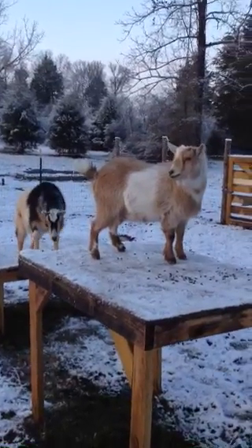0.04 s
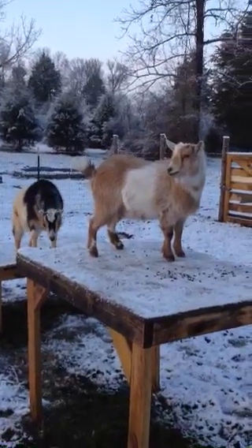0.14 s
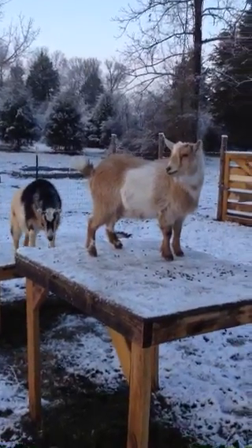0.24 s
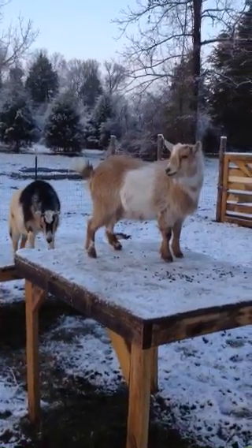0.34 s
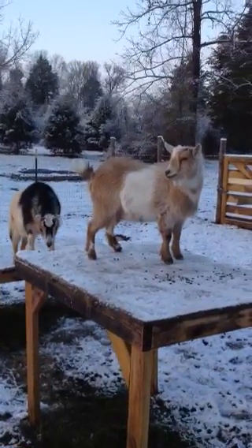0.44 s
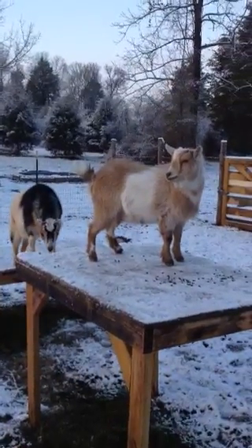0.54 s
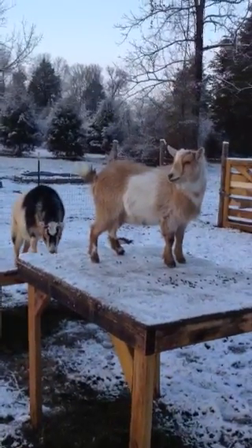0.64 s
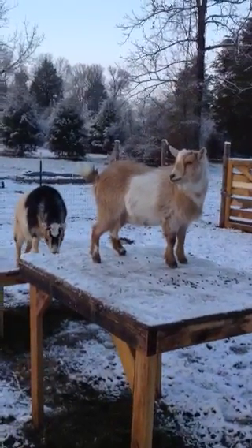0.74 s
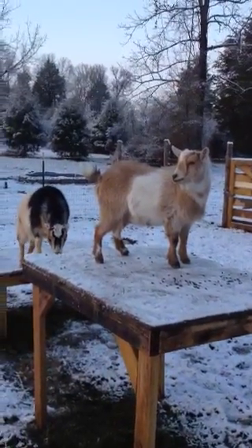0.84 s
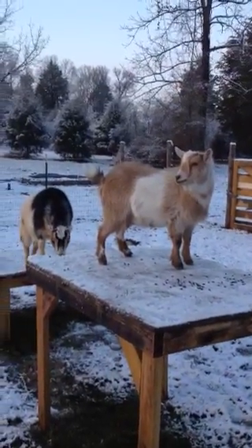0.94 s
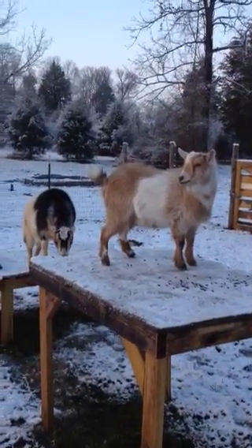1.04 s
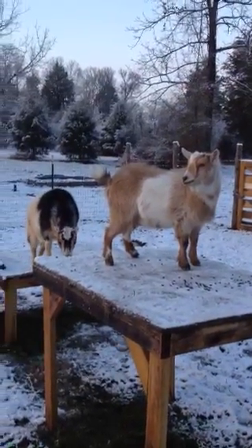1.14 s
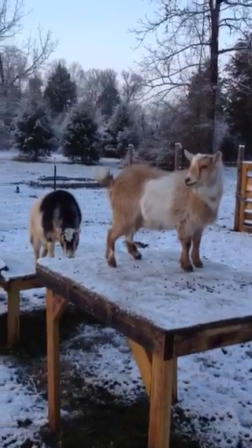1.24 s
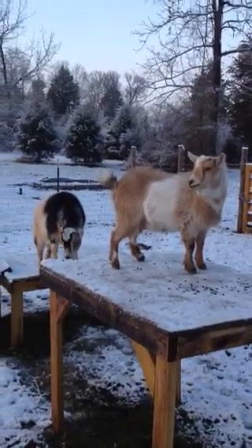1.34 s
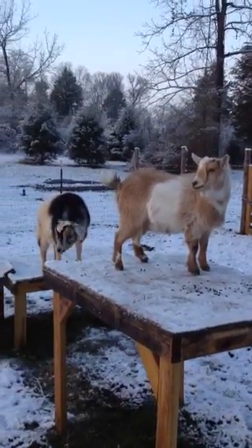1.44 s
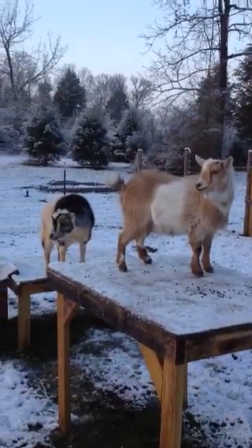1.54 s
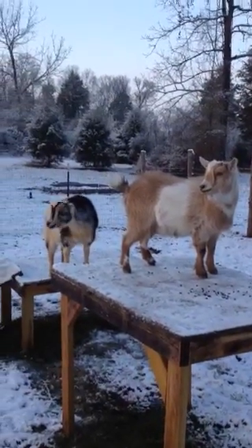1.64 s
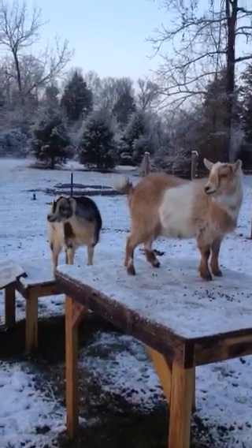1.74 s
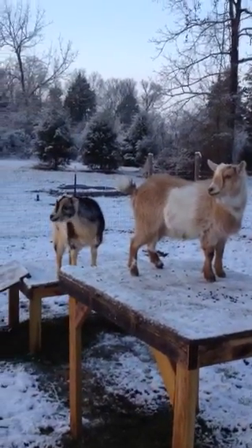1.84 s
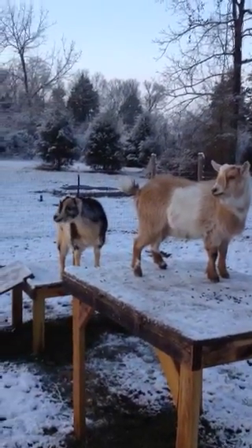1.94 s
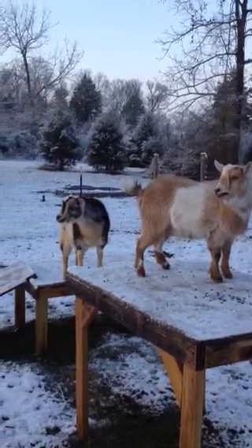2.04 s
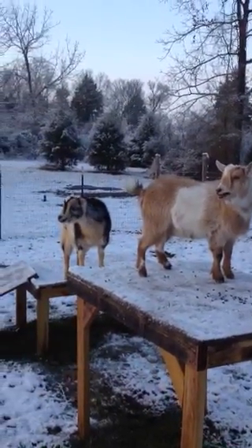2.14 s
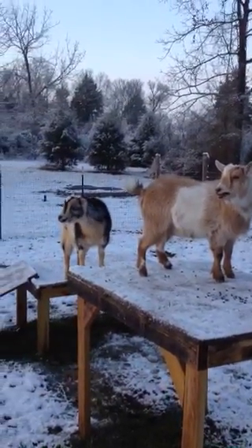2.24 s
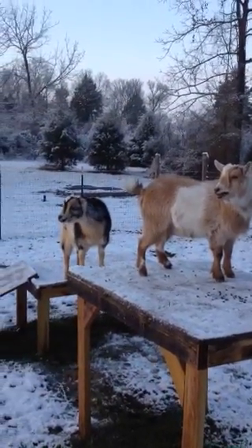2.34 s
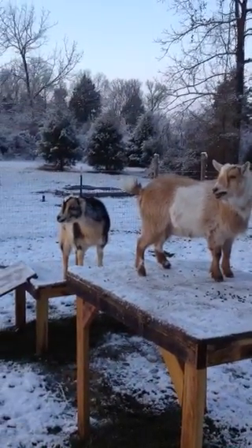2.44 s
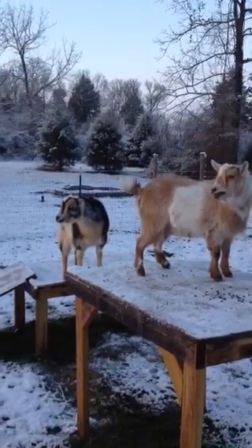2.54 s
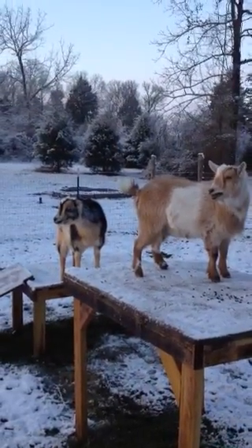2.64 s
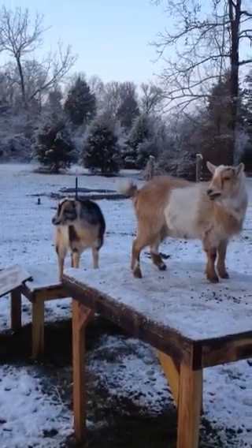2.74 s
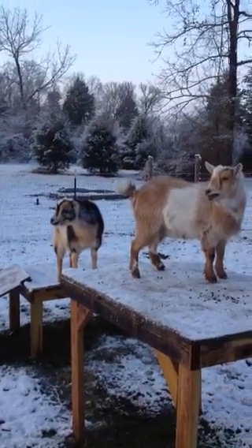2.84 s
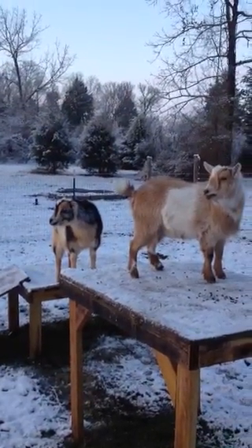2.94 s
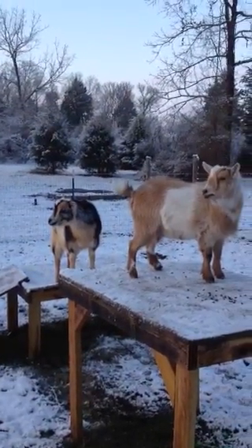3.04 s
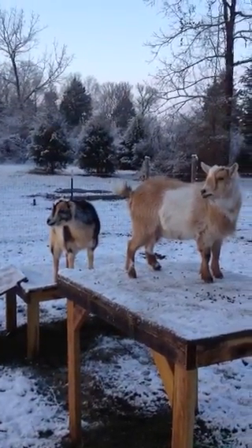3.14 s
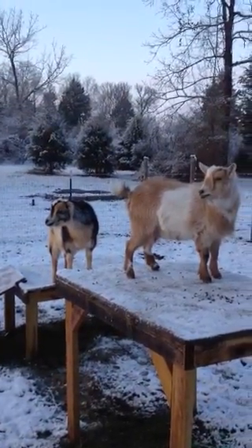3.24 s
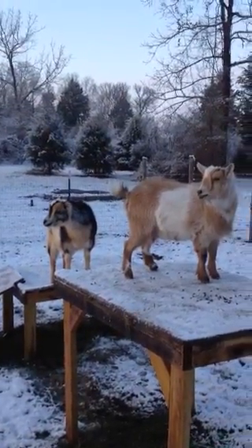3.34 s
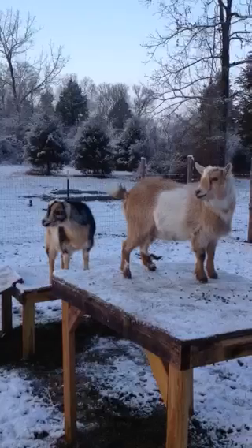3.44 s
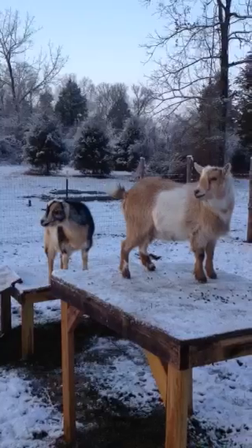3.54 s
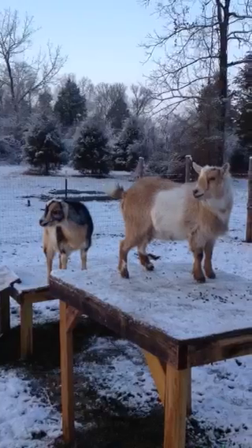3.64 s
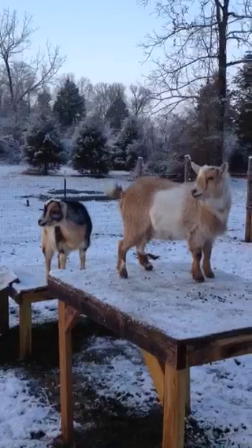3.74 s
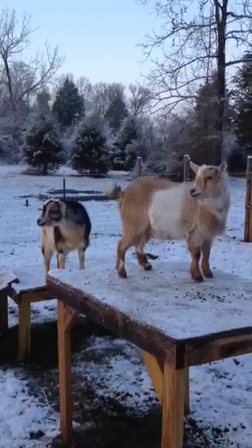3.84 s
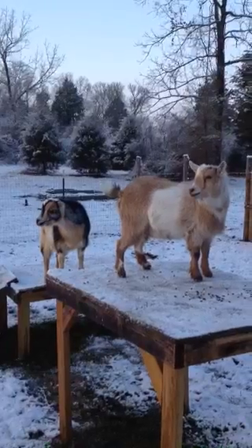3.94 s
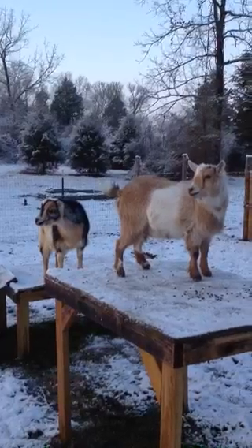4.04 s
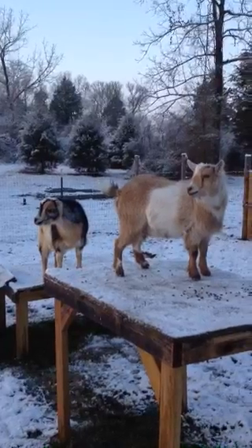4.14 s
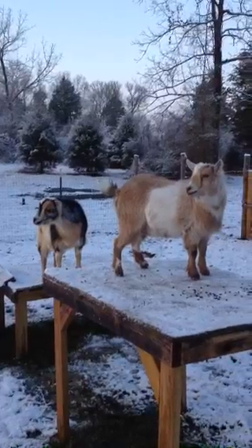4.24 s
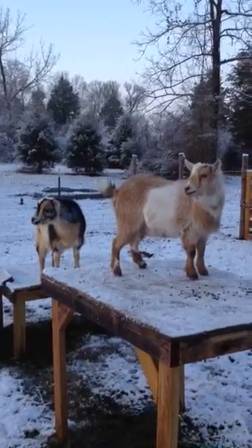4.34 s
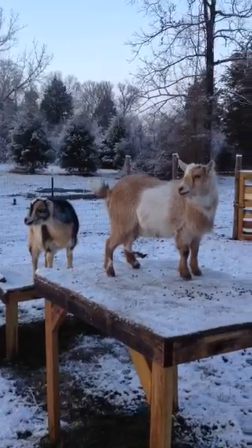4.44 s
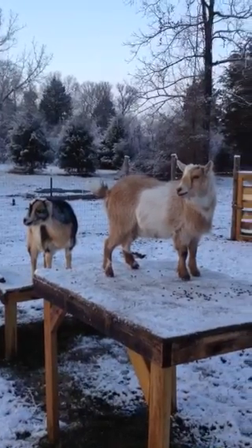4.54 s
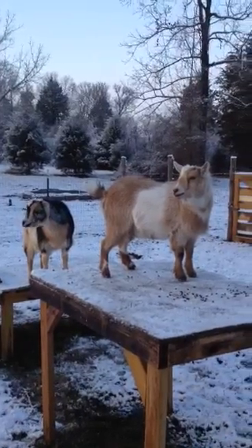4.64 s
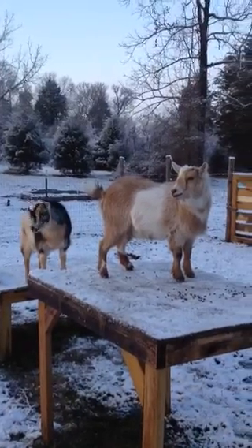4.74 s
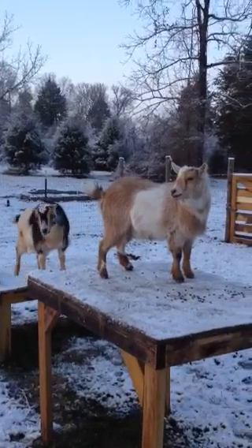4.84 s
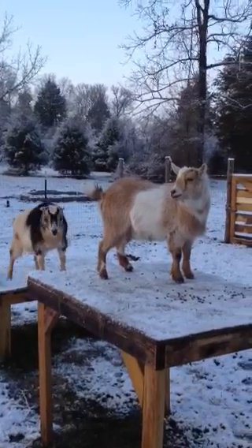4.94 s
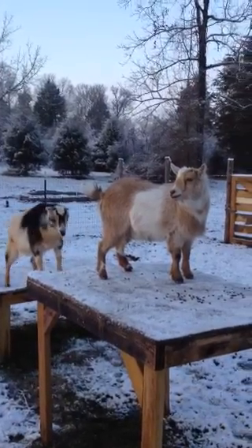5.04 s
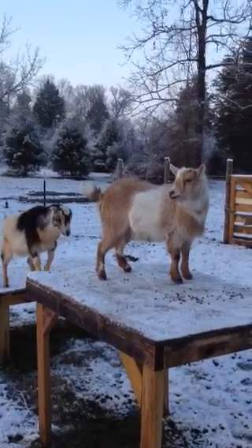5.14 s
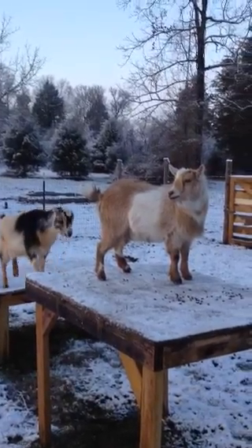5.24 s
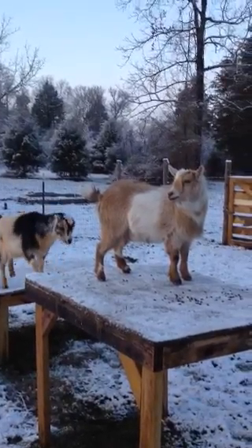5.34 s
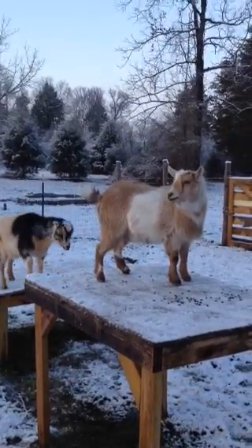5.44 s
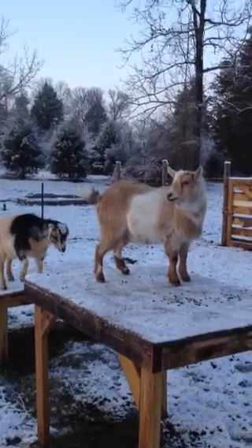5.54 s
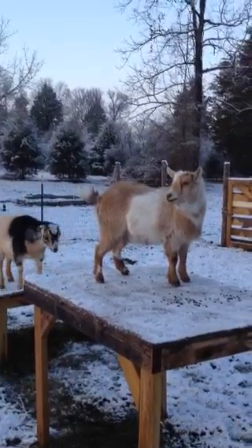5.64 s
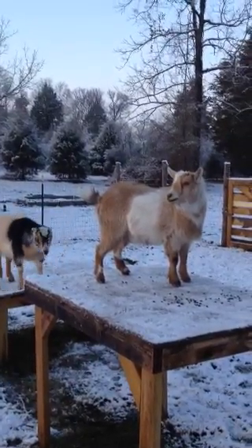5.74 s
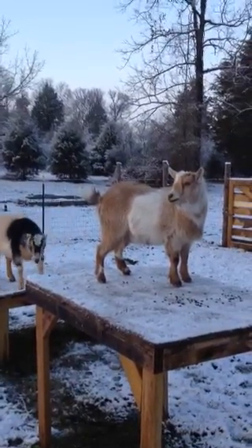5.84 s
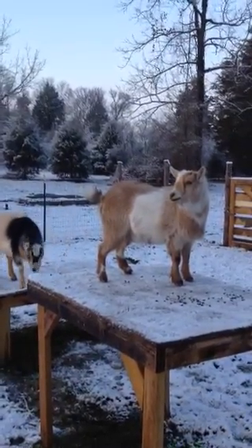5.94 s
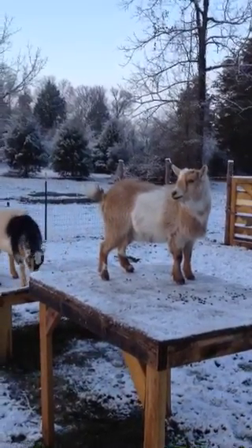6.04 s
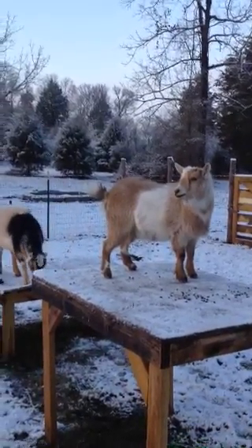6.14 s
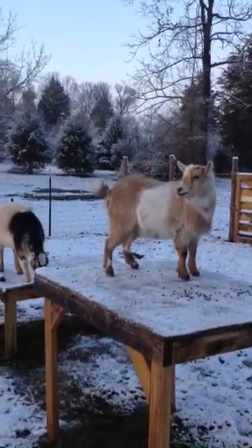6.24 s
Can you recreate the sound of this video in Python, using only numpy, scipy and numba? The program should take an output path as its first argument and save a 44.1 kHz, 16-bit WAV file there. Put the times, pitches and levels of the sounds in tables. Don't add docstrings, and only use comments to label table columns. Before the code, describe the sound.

Quiet snowy yard with a very faint far motor hum. Light hoof taps, soft snow crunches and a dry rustle come first. At two seconds a small goat lets out one loud, nasal, rapidly trembling bleat lasting about a second, ending in a sagging rattle. Two seconds of near stillness follow, then a cluster of sharp hoof knocks and snow crunches on planks. Single microphone, nearby, outdoors.

```python
import sys
import numpy as np
from scipy import signal
from scipy.fft import rfft, irfft
from scipy.io import wavfile
from scipy.ndimage import uniform_filter1d
from numba import njit

SR = 44100
rng = np.random.default_rng(int(sys.argv[2]) if len(sys.argv) > 2 else 0)


def invert_db(x):
    u = np.asarray(x, float) / 20
    return 10 ** u


def waveform_to_disk(signal):
    frames = np.transpose(np.atleast_2d(signal))
    scaled = np.clip(frames, -1, 1) * 32767
    samples = np.round(scaled).astype(np.int16)
    wavfile.write(sys.argv[1], SR, samples)


N = 278271

# (frequency [Hz], density [dB per Hz])
AIR_SPECTRUM = [(15, -41), (25, -43), (64, -15.5), (91, -18.5), (122, -3.5), (173, -8), (313, -7.5),
                (801, -12), (892, -12.5), (993, -16.5), (1750, -18), (2830, -22.5), (7650, -30.5),
                (10000, -36.5), (15400, -31)]
AIR_DB = -60.5
# (low [Hz], high [Hz], level [dB])
PORT_HISS = (3950, 4530, -86)
# (frequency [Hz], width [Hz], level [dB])
MOTOR_DUCT = (1736, 85, -77.5)
# (frequency [Hz], rms level [dB])
MOTOR_ORDERS = [(59.2, -89.5), (118.4, -66), (296.1, -73.5), (333.8, -75.5), (387.6, -79), (479.1, -76.5),
                (532.9, -79), (592.2, -83), (651.4, -80), (710.6, -82), (888.2, -76.5), (1007, -85.5),
                (1066, -87), (1184, -85.5)]
# (frequency [Hz], rms level [dB])
MAINS_TONE = [(121.3, -77)]

# (time [s], frequency [Hz], level [dB])
SQUEAK_CURVE = [
    (1.485, 12500, -86),
    (1.54, 12400, -86),
    (1.616, 13200, -83),
    (1.81, 11750, -83),
]
# (time [s], frequency [Hz], level [dB])
FAR_ANIMAL = [
    (0.8, 545, -76),
    (0.922, 563, -63.5),
    (0.978, 614, -63),
    (1.0, 555, -68),
]
# (time [s], frequency [Hz], level [dB])
BIRD_CURVE = [
    (3.47, 6540, -93),
    (3.52, 6760, -90),
    (3.62, 6894, -90),
]

# (time [s], level [dB])
RUSTLE_LEVEL = [
    (0.0, -73),
    (0.16, -75.5),
    (0.35, -83),
]
# (frequency [Hz], width [Hz], level [dB])
TWIG_RESONANCE = (9000, 2500, -38)
TWIG_TICKS = [1.251, 1.749]

# (time [s], peak level [dB], build-up [s])
SNOW_COLLAPSES = [(.03, -72, .03), (.164, -73, 0.041), (.244, -70.5, .09), (.468, -66.5, .012),
                  (.594, -83, .1), (5.112, -60, 0.0055), (5.334, -68, 0.21), (5.488, -53.5, 0.075),
                  (5.68, -69, 0.008), (5.73, -60, 0.024), (5.972, -61, 0.087), (6.168, -64, .03)]
# (frequency [Hz], density [dB per Hz])
SNOW_SPECTRUM = [(500, -21), (900, 4), (2000, 0), (3800, -6.5), (4600, 2.5), (5100, -36), (8000, -11),
                 (15000, -33)]

# (time [s], crack [dB], struck board [dB], ring of that board [Hz])
HOOF_STEPS = [(0.1594, -64, -70, 458), (0.2891, -57, -66, 360), (0.4665, -54, -61.5, 184),
              (1.05, -46, -48, 306), (1.0729, -66, -56, 364), (1.2628, -55, -48.5, 1040),
              (1.2844, -58, -49.5, 1160), (1.5596, -57, -76, 299), (5.114, -41.5, -49, 223),
              (5.135, -62, -53, 326), (5.1882, -51, -64.5, 480), (5.2521, -51, -56, 880),
              (5.3153, -49, -44.5, 790), (5.3352, -67, -55.5, 1150), (5.3542, -65, -61, 703),
              (5.4873, -34.5, -45.5, 273), (5.51, -39.5, -49.5, 372), (5.679, -47.5, -62.5, 604),
              (5.7177, -60, -64, 392), (5.7572, -52, -56, 1200), (5.7818, -51, -48, 1250),
              (5.8197, -52.5, -79, 326), (5.9653, -41.5, -47, 1250), (5.9891, -48.5, -51, 1290),
              (6.1691, -45.5, -54.5, 1060), (6.199, -53, -58, 883), (6.2386, -55, -65, 324)]
# (frequency [Hz], level [dB])
PLATFORM_MODES = [(210, 0.5), (290, -1), (385, 3.5), (480, 0.5), (600, -28)]
# (frequency [Hz], level [dB])
PLANK_MODES = [(790, -5), (960, 1), (1150, 9.5), (1300, 0), (1520, 3), (1950, 7.5)]

# (time [s], pitch [Hz], effort [dB])
GRUNT_TURNS = [
    (1.923, 403.9, -65.5),
    (1.986, 383.2, -74),
]
# (time [s], pitch [Hz], effort [dB])
CATCH_TURNS = [
    (2.028, 396.4, -49),
    (2.056, 330.5, -43.5),
    (2.067, 322, -55),
    (2.082, 218.5, -58),
    (2.13, 396.6, -42.5),
    (2.141, 375, -45),
    (2.149, 338, -40),
    (2.162, 315.6, -63),
]
# (tensest [s], pitch [Hz], slackest after [s], pitch [Hz])
FOLD_WAVERS = [(2.205, 395.2, 0.025, 347.9), (2.262, 394, .025, 351), (2.325, 402.6, 0.024, 352.5),
               (2.376, 427.3, 0.035, 360.6), (2.446, 435.8, 0.036, 367.2), (2.508, 431, 0.043, 383.4),
               (2.573, 463.5, .038, 355.4), (2.661, 437.2, .041, 364.5), (2.735, 433, .031, 379.2),
               (2.797, 449, 0.049, 365.2), (2.877, 441.6, 0.036, 377), (2.942, 413.5, 0.027, 364.2)]
# (first slap [s], length [s], first pitch [Hz])
FOLD_CREAKS = [(2.1007, .014, 185), (2.1748, .013, 200), (2.2466, .006, 288), (2.3029, .0085, 284),
               (2.6315, .0125, 222)]
# (time [s], pitch [Hz], effort [dB])
FOLD_RUN_DOWN = [
    (2.983, 369.4, -48),
    (3.034, 293.4, -54.5),
    (3.048, 204.6, -54.5),
    (3.075, 138.2, -61),
]
# (time [s], first resonance [Hz], throat opening [dB])
MOUTH_SHAPE = [(1.9, 700, -2), (2.03, 686, -17.5), (2.06, 741, -13), (2.12, 905, -15), (2.22, 1073, -8.5),
               (2.92, 1082, -7), (3.0, 1023, -5.5), (3.045, 856.4, 0.5), (3.1, 650, 0)]
# (frequency [Hz], width [Hz], level [dB])
THROAT_PEAKS = [(445, 170, -13.5), (2010, 256, -0.5), (2580, 154, 7), (3100, 730, 1.5), (3900, 630, 1)]
# (frequency [Hz], width [Hz], level [dB])
TENSE_PEAKS = [(4655, 230, 0.5), (5010, 1030, -8)]
# (frequency [Hz], width [Hz], level [dB])
NASAL_PEAKS = [(5520, 345, -2.5), (6020, 570, -2.5), (6760, 260, -1.5), (7340, 210, -3.5), (8600, 370, -11)]
# (frequency [Hz], width [Hz], level [dB])
SLAP_PEAKS = [(8920, 860, -4), (12500, 4100, -13.5)]
# (delay [s], level [dB])
YARD_ECHOES = [(.0071, -19), (.0113, -18), (.0187, -20), (.029, -22), (.047, -25), (.083, -29)]
# (low [Hz], high [Hz], readiness [0-1 scale,
# offset])
PATCHY_BANDS = [(10500, 11600, .5), (12400, 13200, -.3)]


def rms_one(x):
    return x / np.sqrt(np.mean(x ** 2) + 1e-30)


def in_time(rows, edge_db=None):
    s, *columns = np.transpose(rows)
    return [np.interp(np.arange(N) / SR, s, c, edge_db, edge_db) for c in columns]


def coloured(points):
    hz, db = np.transpose(points)
    noise_hz = np.arange(1, N // 2 + 2) * SR / N
    gain = invert_db(np.interp(np.log(noise_hz), np.log(hz), db))
    return rms_one(irfft(rfft(rng.standard_normal(N)) * gain, N))


def drift(rate):
    knots_per_s = 60
    knots = rng.standard_normal(int(N / SR * knots_per_s) + 2)
    memory = np.exp(-2 * np.pi * rate / knots_per_s)
    knots = rms_one(signal.lfilter([1], [1, -memory], knots))
    return np.interp(np.arange(N) / SR * knots_per_s, np.arange(len(knots)), knots)


def band(x, low_hz, high_hz):
    return signal.sosfilt(signal.butter(2, [low_hz, high_hz], "band", fs=SR, output="sos"), x)


def resonance(x, hz, width_hz, db=0):
    r = np.exp(-np.pi * width_hz / SR)
    zeros = [(1 - r * r) / 2, 0, (r * r - 1) / 2]
    poles = [1, -2 * r * np.cos(2 * np.pi * hz / SR), r * r]
    return invert_db(db) * signal.lfilter(zeros, poles, x)


def parallel(x, peaks):
    return sum((-1) ** k * resonance(x, *peak) for k, peak in enumerate(peaks))


@njit
def moving_resonance(x, hz, r, sr):
    y = np.zeros(len(x))
    for i in range(2, len(x)):
        push = (1 - r * r) / 2 * (x[i] - x[i - 2])
        y[i] = push + 2 * r * np.cos(2 * np.pi * hz[i] / sr) * y[i - 1] - r * r * y[i - 2]
    return y


def air():
    hiss = invert_db(AIR_DB - 3 + 1.03 * drift(8.5)) * coloured(AIR_SPECTRUM)
    duct_hz, width_hz, duct_db = MOTOR_DUCT
    duct = rms_one(resonance(rng.standard_normal(N), duct_hz, width_hz)) * invert_db(duct_db + 1.8 * drift(21))
    low_hz, high_hz, port_db = PORT_HISS
    port = invert_db(port_db) * rms_one(band(rng.standard_normal(N), low_hz, high_hz))
    return hiss + duct + port


def motor():
    t = np.arange(N) / SR
    hum = np.zeros(N)
    for hz, db in MOTOR_ORDERS + MAINS_TONE:
        level = np.sqrt(2) * invert_db(db + 0.34 * drift(7.7))
        hum += level * np.sin(2 * np.pi * (hz * t + rng.random()))
    return hum


def whistle(rows, half_db):
    hz, db = in_time(rows)[0], in_time(rows, -130)[1]
    phase = 2 * np.pi * np.cumsum(hz) / SR
    level = uniform_filter1d(invert_db(db - 0.7 + 3.2 * drift(20)), size=300)
    return np.sqrt(2) * level * (np.sin(phase) + invert_db(half_db) * np.sin(phase / 2))


def brushing():
    tick = np.zeros(N) + 1e-12
    tick[(np.array(TWIG_TICKS) * SR).astype(int)] = 1
    hiss = rms_one(band(rng.standard_normal(N), 5000, 11400))
    hiss = hiss * invert_db(in_time(RUSTLE_LEVEL, -120)[0] + 2.9 * drift(25))
    return hiss + resonance(resonance(tick, *TWIG_RESONANCE[:2]), *TWIG_RESONANCE)


def crunch(per_s=2500):
    rise_db, fall_db_per_s, settle_db, settle_db_per_s = 16.5, 210, -18, 52
    broken = rng.random(N) < per_s * invert_db(4 * drift(25)) / SR
    grains = broken * invert_db(0.68 * rng.exponential(1, N))
    grains = signal.lfilter([1], [1, -.93], grains)
    level = 0
    for s, db, build_s in SNOW_COLLAPSES:
        since = np.arange(N) / SR - s
        before = invert_db(-rise_db * abs(since) / max(build_s, .002))
        after = invert_db(-fall_db_per_s * abs(since)) + invert_db(settle_db - settle_db_per_s * abs(since))
        level = level + invert_db(db) * np.where(since < 0, before, after)
    return level * invert_db(-0.5) * rms_one(grains * coloured(SNOW_SPECTRUM))


def hooves(size=6000):
    beam_t60_s, board_t60_s = 0.099, 0.068
    out, t = np.zeros(N + size), np.arange(size) / SR
    for s, crack_db, board_db, ring_hz in HOOF_STEPS:
        over_beam = ring_hz < 650
        if over_beam:
            boom_db, plank_db, t60 = board_db, -62 + 0.35 * (crack_db + 53.5), beam_t60_s
        else:
            boom_db, plank_db, t60 = board_db - 12.5, board_db, board_t60_s
        grind, spread = rng.standard_normal(size), rng.normal(0, 2.1, 11)
        push = grind * (invert_db(-60 * t / 0.0052) + 0.49 * invert_db(-60 * t / max(t60, .01)))
        struck = resonance(push, ring_hz, 40 + 0.039 * ring_hz, 12.7)
        boom = sum(resonance(push, hz, 51, db + d) for (hz, db), d in zip(PLATFORM_MODES, spread))
        plank = sum(resonance(push, hz, 59, db + d) for (hz, db), d in zip(PLANK_MODES, spread[5:]))
        if over_beam:
            boom = boom + struck
        else:
            plank = plank + struck
        crack = band(push, 1400, 4300) + resonance(push, 4600, 200, -9.0)
        parts = ((band(boom, 116, 1400), boom_db + 11.5),
                 (band(plank, 620, 1780), plank_db + 6.5),
                 (crack, crack_db + 1))
        for part, db in parts:
            out[int(s * SR):][:size] += invert_db(db) * part / np.max(np.abs(part))
    return out[:N]


def folds(jump_s=0.0033, stall_s=.006, stall_db=13, slump=.7):
    tense_db, tense_db_per_hz = -46, 0.1163
    slack_db, spent_s, fade_db_per_s = -42, 2.907, 48
    creak_db, creak_swell_db, creak_rise_hz_per_s, creak_top_hz = -40, 5, 7500, 293.5
    tense, slack = [GRUNT_TURNS[0], *CATCH_TURNS[::2]], [GRUNT_TURNS[1], *CATCH_TURNS[1::2]]
    for s, tense_hz, after, slack_hz in FOLD_WAVERS:
        tense.append((s, tense_hz, tense_db + tense_db_per_hz * (tense_hz - 400)))
        slack.append((s + after, slack_hz, slack_db - fade_db_per_s * max(s + after - spent_s, 0)))
    turns = [(*w, 1) for w in tense] + [(*w, 0) for w in slack] + [(*w, .1) for w in FOLD_RUN_DOWN]
    for s, length, hz in FOLD_CREAKS:
        _, next_hz, next_db = min(w for w in tense if w[0] > s)
        end_hz = min(hz + creak_rise_hz_per_s * length, creak_top_hz)
        turns += [(s - stall_s, 1.05 * hz, creak_db - stall_db, .1),
                  (s, hz, creak_db, .15),
                  (s + length, end_hz, creak_db + creak_swell_db, .15),
                  (s + length + jump_s, 1.1 * next_hz, next_db + 3.5, .7)]
    s, *controls = np.transpose(sorted(turns))
    t = np.arange(N) / SR
    place = np.interp(t, s, np.arange(len(s)))
    letting_go = np.append(np.diff(controls[2]) == -1, False)[place.astype(int)]
    progress = (place % 1) ** np.where(letting_go, slump, 1)
    eased = np.floor(place) + np.sin(np.pi / 2 * progress) ** 2
    pitch, effort_db, tension = (np.interp(eased, np.arange(len(s)), v) for v in controls)
    sounding = np.interp(t, [s[0] - .02, s[0], s[-1], s[-1] + 0.022], [0, 1, 1, 0])
    return pitch, effort_db, tension, sounding


def tract(nose_opens_hz=740, nose_db_per_hz=2.0, nose_shuts_db=-3.5):
    mouth_hz, throat_db = in_time(MOUTH_SHAPE)
    mouth_db = -4.5 + 0.86 * (throat_db + 7.5)
    closed_hz = np.maximum(nose_opens_hz - mouth_hz, 0).clip(0, 70)
    nose_db = 2.5 - nose_db_per_hz * closed_hz - 2.2 * np.maximum(throat_db - nose_shuts_db, 0)
    return mouth_hz, mouth_db, throat_db, nose_db


def glottis(pitch, effort_db, sounding):
    jitter, shimmer_db, breath = .01, 1.6, .23
    cycles = np.cumsum(pitch / SR)
    for s, _, _ in FOLD_CREAKS:
        late = cycles[int(s * SR)] - np.round(cycles[int(s * SR)])
        cycles = cycles - late * np.clip((np.arange(N) / SR - s) / .012 + 1, 0, 1)
    count = np.arange(1, int(cycles[-1]) - 1)
    chance = rng.standard_normal((2, 3000))[:, :len(count)]
    at = np.interp(count + jitter * chance[0], cycles, np.arange(N))
    whole, part, size = at.astype(int), at % 1, invert_db(shimmer_db * chance[1])
    closures = np.zeros(N)
    closures[whole], closures[whole + 1] = size * (1 - part), size * part
    puff = breath * rng.standard_normal(N) * np.exp(-2 * (cycles % 1))
    puff = puff * invert_db(np.clip(-.6 * (effort_db + 46), 0, 9))
    source = (closures * np.sqrt(SR / pitch) + puff) * sounding + 1e-12
    return source, puff


def bleat(ring_swing_db=7, throat_swing_db=5, mouth_swing_db=-5.5, mouth_follows=0.75,
          nose_swing_db=-3, break_db=-6):
    mouth_width_hz, flutter_db = 60, 2.2
    pitch, effort_db, tension, sounding = folds()
    mouth_hz, mouth_db, throat_db, nose_db = tract()
    source, puff = glottis(pitch, effort_db, sounding)
    thinning = invert_db(break_db * (4 * tension * (1 - tension)) ** 3.5)
    source = source * thinning
    bright = source * invert_db(effort_db)
    clear = source - .5 * puff * sounding * thinning
    deep_db = mouth_follows * (effort_db + 50) - 24.0 + mouth_db + mouth_swing_db * tension
    deep = clear * invert_db(deep_db)
    mouth = moving_resonance(deep, mouth_hz, np.exp(-np.pi * mouth_width_hz / SR), SR)
    voice = band(mouth, 410, 1850)
    for k, peak in enumerate(THROAT_PEAKS):
        level_db = throat_db + 7 + throat_swing_db * tension + flutter_db * drift(25)
        voice = voice + (-1) ** k * resonance(bright * invert_db(level_db), *peak)
    for peak in TENSE_PEAKS:
        level_db = 6.5 + ring_swing_db * tension + flutter_db * drift(30)
        voice = voice + resonance(bright * invert_db(level_db), *peak)
    voice = voice + resonance(deep * invert_db(8.8 * tension), 1000, 380, -14.5)
    nose = bright * invert_db(nose_db + 13.5 + nose_swing_db * tension)
    for k, peak in enumerate(NASAL_PEAKS):
        voice = voice - (-1) ** k * resonance(nose * invert_db(flutter_db * drift(28)), *peak)
    voice = voice + parallel(bright * invert_db(0.58 * (effort_db + 46.0)), SLAP_PEAKS)
    voice = voice - resonance(voice, 11030, 3800, -0.72)
    voice = voice - resonance(voice, 1365, 330, -7.5)
    voice = signal.sosfilt(signal.butter(2, 9500, fs=SR, output="sos"), voice)
    dull = signal.sosfilt(signal.butter(1, 5000, fs=SR, output="sos"), voice)
    return voice + sum(invert_db(db) * np.roll(dull, int(lag * SR)) for lag, db in YARD_ECHOES)


def scene():
    calls = whistle(SQUEAK_CURVE, -4) + whistle(FAR_ANIMAL, -24) + whistle(BIRD_CURVE, -28)
    mono = air() + motor() + calls + brushing() + crunch() + hooves() + bleat()
    return np.array([mono, mono])


def roll_off(x):
    return signal.sosfilt(signal.butter(12, 15540, fs=SR, output="sos"), x)


def record(dry):
    loud_db = 10 * np.log10(uniform_filter1d(dry[0] ** 2, size=5000) + 1e-12)
    mute = np.clip((loud_db + 46) / 3, 0, .95)
    for *edges, readiness in PATCHY_BANDS:
        patchy = np.clip(readiness + .5 + drift(8), 0, 1)
        treble = signal.sosfiltfilt(signal.butter(3, edges, "band", fs=SR, output="sos"), dry)
        dry = dry - mute * patchy * treble
    cutoff_hz = 15500
    edge = signal.cheby2(16, 40, cutoff_hz * 1.015, fs=SR, output="sos")
    return roll_off(signal.sosfilt(edge, dry))


dry = scene()
out = record(dry)
waveform_to_disk(out)
```